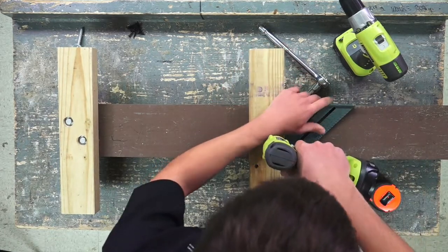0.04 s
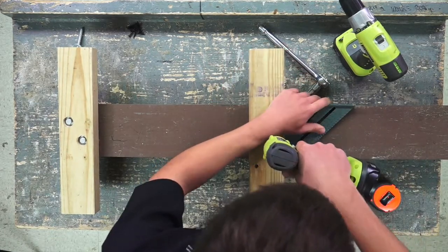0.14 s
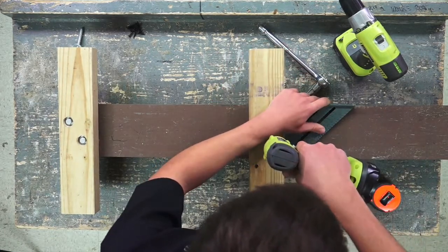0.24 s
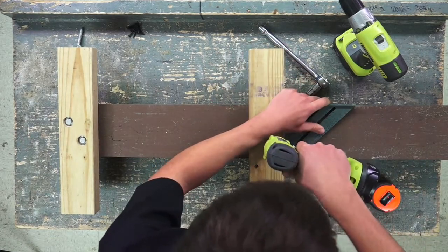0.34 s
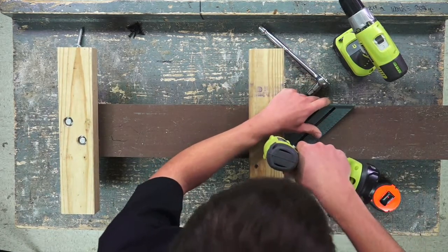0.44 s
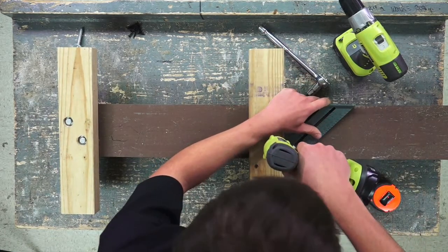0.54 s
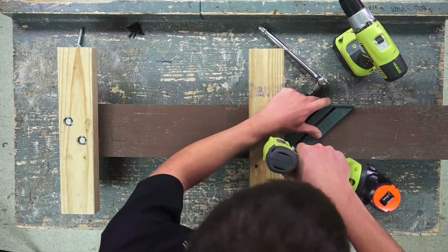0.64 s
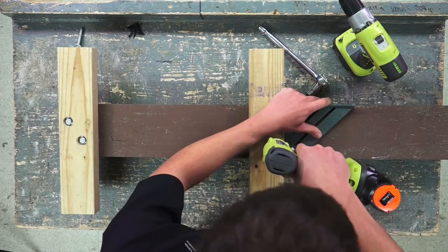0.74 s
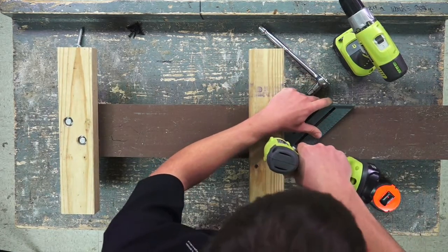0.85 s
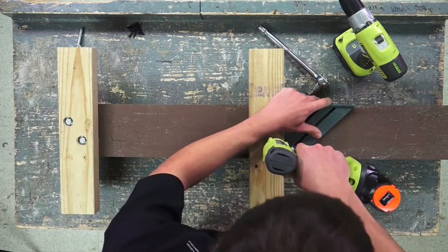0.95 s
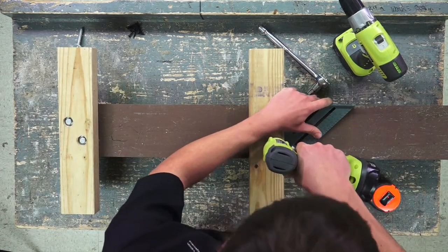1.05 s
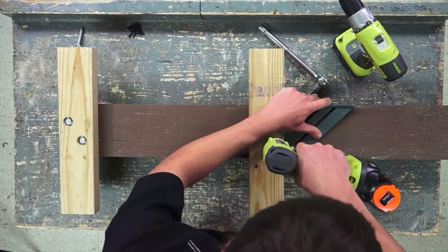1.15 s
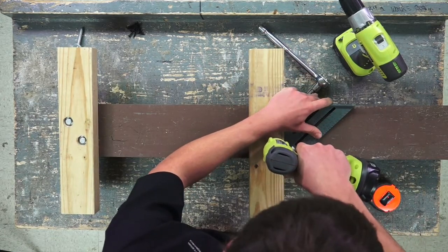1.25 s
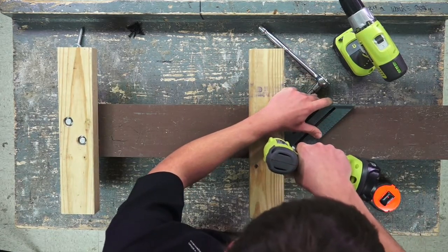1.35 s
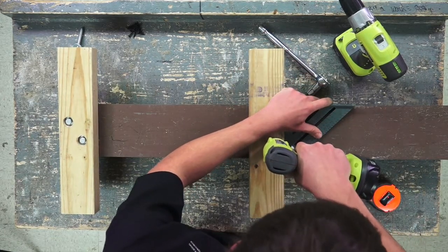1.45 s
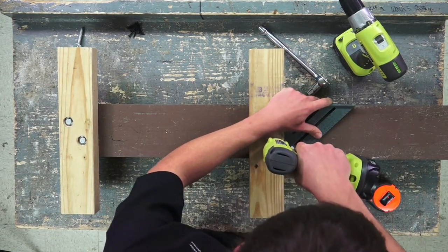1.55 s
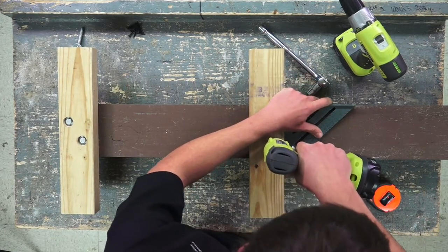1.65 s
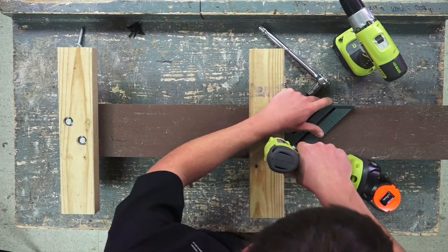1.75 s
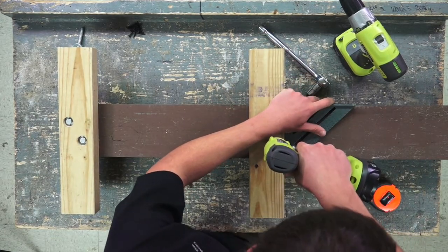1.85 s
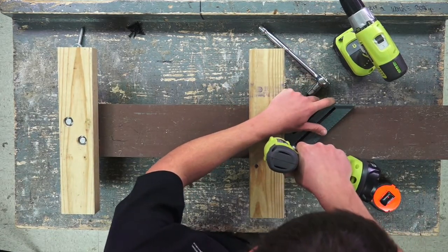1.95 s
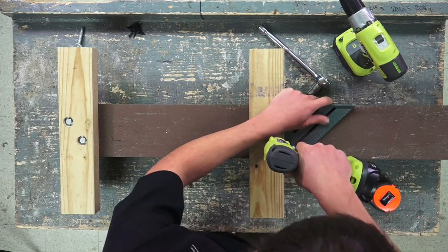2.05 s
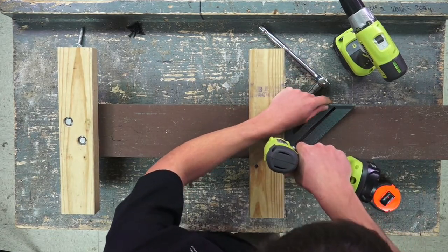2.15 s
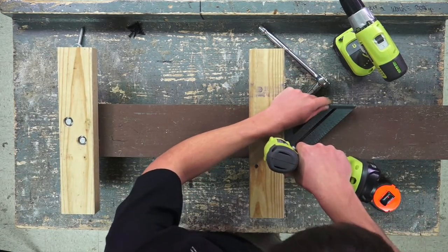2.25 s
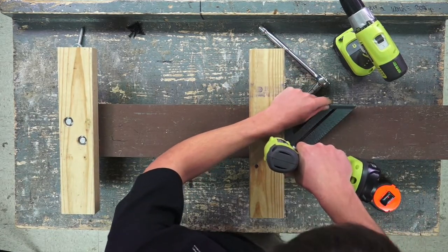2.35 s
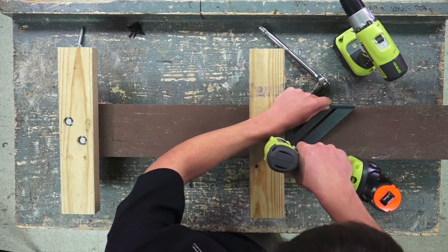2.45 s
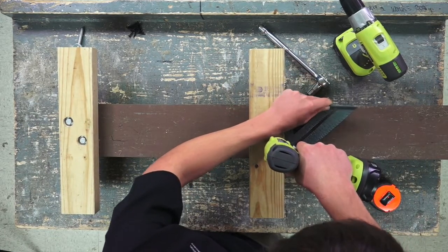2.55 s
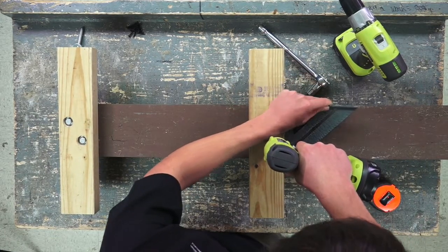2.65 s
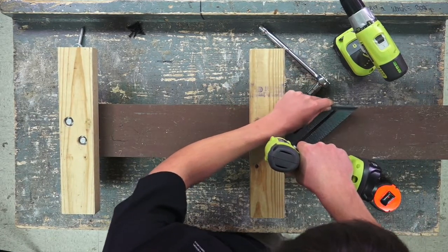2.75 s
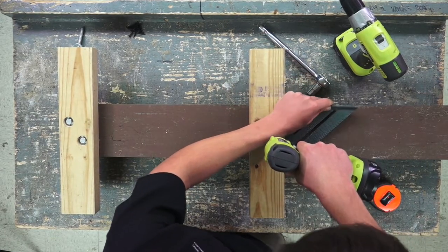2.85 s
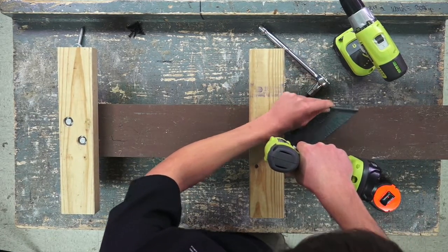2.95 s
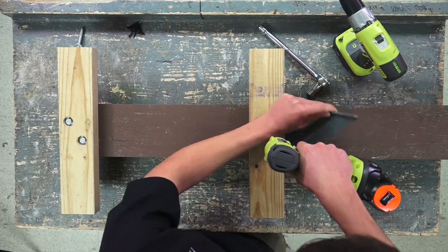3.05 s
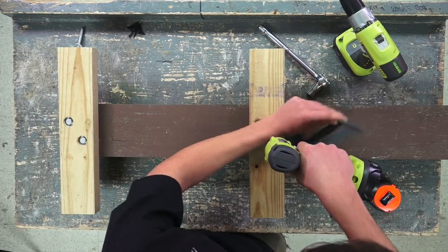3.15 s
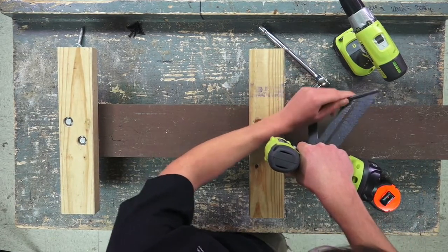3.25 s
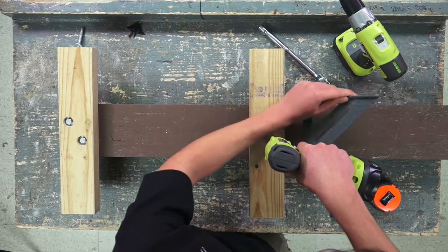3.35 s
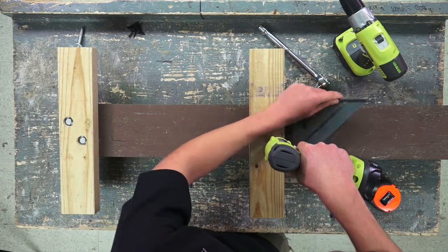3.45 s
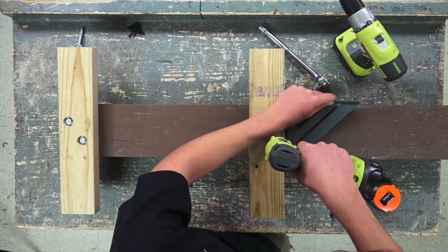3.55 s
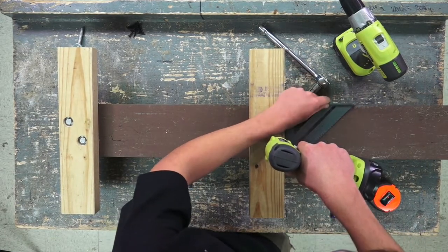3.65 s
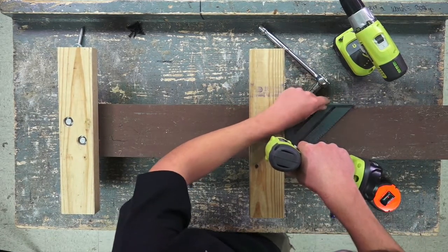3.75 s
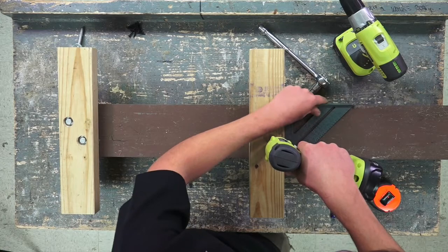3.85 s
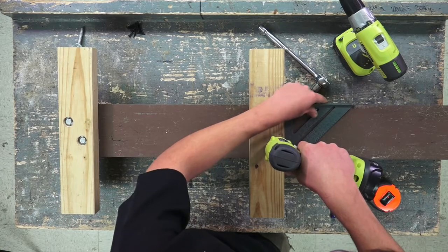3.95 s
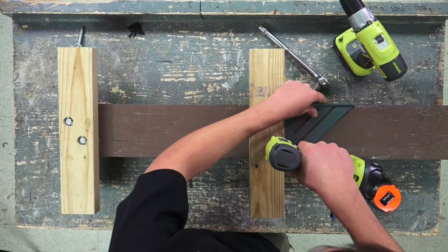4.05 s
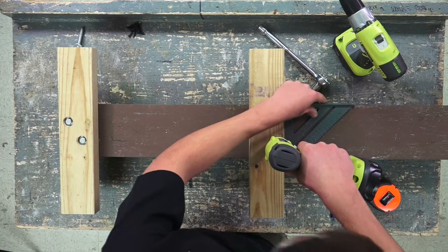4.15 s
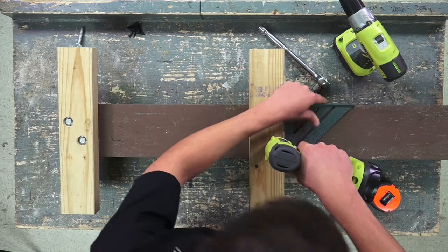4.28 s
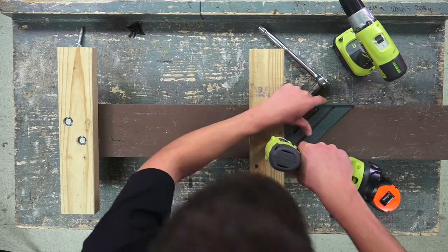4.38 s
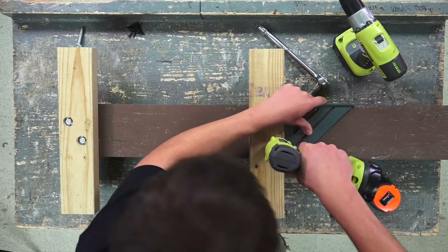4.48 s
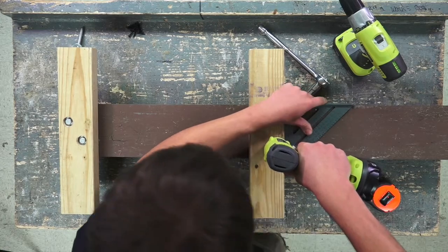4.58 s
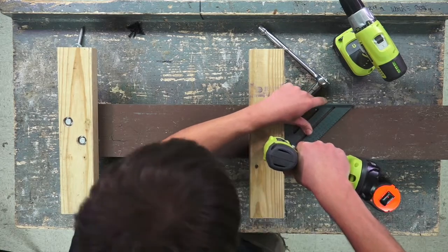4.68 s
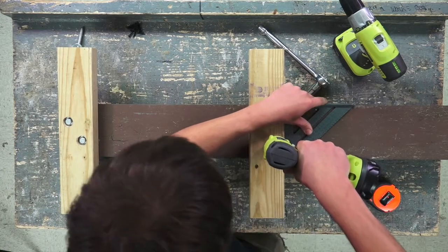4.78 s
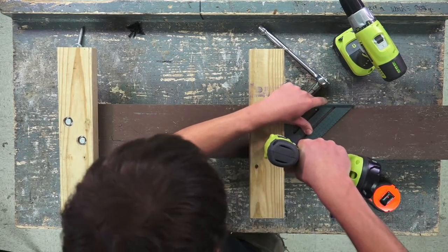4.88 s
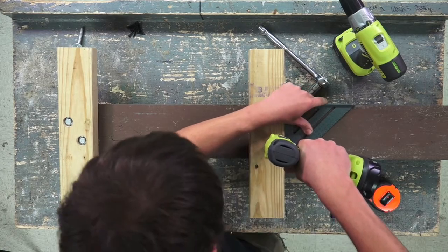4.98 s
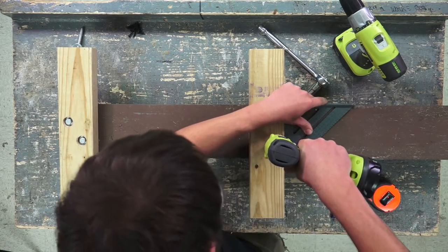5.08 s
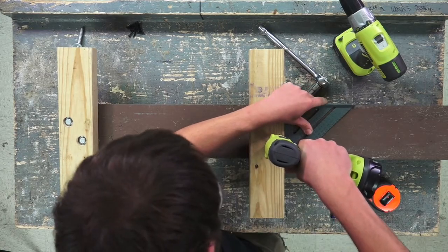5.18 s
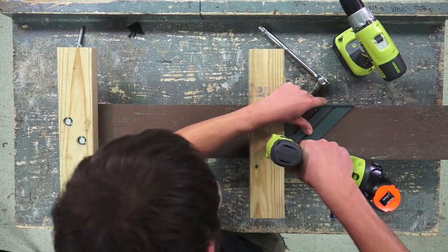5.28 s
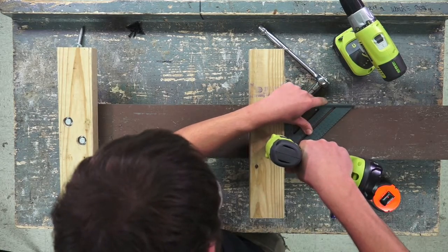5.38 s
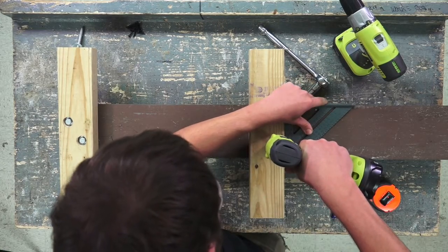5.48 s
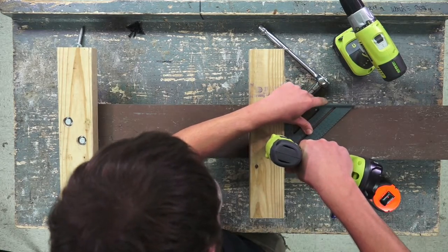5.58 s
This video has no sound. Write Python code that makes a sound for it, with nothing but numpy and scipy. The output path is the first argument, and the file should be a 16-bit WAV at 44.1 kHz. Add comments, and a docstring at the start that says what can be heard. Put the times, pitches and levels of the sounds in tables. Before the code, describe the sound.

A cordless impact driver spins up and hammers a bolt into a wooden board for about a second, a loud, fast metallic rattle, then winds down. In the pause come faint knocks on wood, and a metal square is lifted, set down with a clink and slid briefly. A second, similar burst follows. An overhead microphone picks it up in a small workshop with a faint ventilation hum.

```python
"""Small workshop, one overhead microphone. A cordless impact driver runs a bolt into a board on a bench.
Two bursts: the controller whistles, the motor spins up, the hammer strikes the anvil about 52 times a
second. Each blow cracks, rings the tool and thumps the bench. Between bursts a metal square is lifted,
set down with a clink and slid along the wood. Ventilation and mains hum lie underneath."""
import sys
import numpy as np
from scipy import signal
from scipy.fft import rfft, irfft, next_fast_len
from scipy.io import wavfile
from scipy.ndimage import uniform_filter1d

SR = 44100
rng = np.random.default_rng(int(sys.argv[2]) if len(sys.argv) > 2 else 0)


def store_pcm(level_fs):
    """Save levels as 16-bit WAV."""
    pcm = np.round(np.clip(level_fs, -1, 1) * 32767).astype(np.int16)
    wavfile.write(sys.argv[1], SR, np.atleast_2d(pcm).T)


N = 247842

# steady hammering: first_s, last_s, top_rate_hz, bite_s, sag_hz_per_s
BURSTS = [(.6943, 1.785, 53.875, .847, 4.26), (4.5615, 5.62, 52.975, 5.107, 7.94)]
# blow force set by the wood's resistance, one curve per burst: time_s, level_db
BLOW_FORCE = [
    [(0.77, -20.5), (0.92, -16.5), (1.04, -17), (1.07, -17), (1.25, -20), (1.31, -16), (1.43, -18),
     (1.46, -14), (1.78, -16)],
    [(4.64, -20), (4.76, -16.0), (4.91, -17), (4.94, -13.5), (5.09, -16.5), (5.21, -14), (5.24, -18.5),
     (5.36, -14), (5.59, -16)],
]
# single blows as the hammer catches and lets go: start_s, level_db
STRAY_BLOWS = [(.660, -21.5), (.685, -17.5), (.7055, -10.5), (1.8, -14.5), (1.834, -15.5), (1.883, -17),
               (4.533, -10.5), (4.5551, -15)]
# housing, socket and bolt: pitch_hz, nominal_width_hz, gain_db
TOOL_MODES = [(643.6, 190, -8.5), (1002, 140, -1), (1394, 280, -1.5), (1720, 320, -4), (2185, 110, 1.5),
              (2870, 180, -3.5), (3566, 160, 0.5), (4426, 150, -5.5), (4980, 300, -8.5), (5680, 200, -17.5),
              (6923, 660, -13)]
# board and bench: pitch_hz, nominal_width_hz, gain_db
BENCH_MODES = [(106.7, 10, -0.5), (203, 26, 0.5), (246.6, 82, -7), (360.8, 16, -2.5), (396.8, 17, -4.5),
               (505, 17, -1), (641, 66, -3.5), (731, 30, -2.5), (1086.4, 43, 7)]
# steel on steel: freq_hz, gain_db
CRACK_SPECTRUM = [(300, -60.5), (1500, -19), (3000, -3), (4500, 5), (6200, -1), (7200, -3), (9000, -2.5),
                  (11000, -5.5), (14000, -6.5), (15600, -4.5)]
# trigger: press_s, motor_start_s, release_s
TRIGGER_PULLS = [(.589, 0.64, 1.878), (4.472, 4.496, 5.7)]
# gears and fan: freq_hz, gain_db
WHIRR_SPECTRUM = [(47, -30.5), (80, -13), (177, -8.5), (774, -8.5), (1080, 4.5), (1600, -2), (1950, -4),
                  (2490, -6.5), (2720, -4), (5040, -12), (15500, -33)]
# coasting bearings: freq_hz, gain_db
BEARING_SPECTRUM = [(100, -14), (250, 1), (500, -8), (1000, -6), (2000, -9), (5000, -25), (15000, -44)]
# square touches board: start_s, clink_db, thud_db
CLINKS = [(3.205, -51.5, -83), (3.217, -43.5, -73.5), (3.553, -32, -53), (3.612, -32.5, -55),
          (3.650, -41.5, -63), (3.675, -47, -73), (3.736, -57, -74)]
# square's blade and stock: pitch_hz, gain_db, t60_s
SQUARE_MODES = [(481, -5, 0.38), (704, -2, 0.13), (1085, 8, 0.12), (1235, 10.5, 0.038), (1590, -1.5, 0.17),
                (1865, -2, 0.15), (2395, 9.5, 0.049), (3040, -10.5, 0.23), (3320, -3, 0.19),
                (3580, 3, 0.086), (3920, -3, 0.2), (4350, 1, 0.2), (4530, 4, 0.081), (5040, 10.5, 0.038),
                (5780, -4, 0.16), (6800, -6, 0.09), (7000, -9, 0.14), (8500, -10, .12), (9450, -7, 0.086)]
# blade ringing in the air: pitch_hz, level_db, t60_s
BLADE_MODES = [(1028, -74, 0.99), (5750, -63, 0.26), (7060, -67, 0.27)]
# square's contact tick: freq_hz, gain_db
TICK_SPECTRUM = [(200, -2.0), (1200, 0), (2800, -1.5), (4800, 4.5), (9000, -9), (15000, -28)]
# hand and tool on wood: start_s, level_db
KNOCKS = [(.108, -64), (2.268, -53), (3.036, -53.5), (3.897, -61), (4.031, -50), (4.262, -66.5)]
# knock or bright scrape on wood: freq_hz, gain_db
WOOD_SPECTRUM = [(150, -11), (450, -2.5), (800, -3), (1250, 1), (2000, -18), (4600, -17), (9000, -24.5),
                 (15000, -38)]
# square over the grain: centre_s, half_length_s, level_db, brightness (0-1)
SLIDES = [(3.222, 0.033, -64.5, 0.7), (3.718, .06, -54, 0.23)]
# slow, dull slide: freq_hz, gain_db
RUB_SPECTRUM = [(80, 1), (200, 0), (450, 0), (800, -0.5), (1300, -17.5), (4000, -42)]
# hand over wood and metal: centre_s, half_length_s, level_db
BRUSHES = [(2.62, 0.032, -78), (2.805, 0.037, -77.5), (2.988, 0.047, -76.5), (3.192, 0.018, -84),
           (4.026, 0.011, -71.5), (4.466, 0.058, -70.5)]
# skin friction: freq_hz, gain_db
SKIN_SPECTRUM = [(300, -12), (1500, 9), (3000, 5), (6000, 2), (10000, -4), (15000, -10)]
# mains hum: pitch_hz, level_db
MAINS_HUM = [(119.8, -70.5), (179.7, -78.5), (240, -75), (360, -83.5), (480, -82.5), (1561, -94),
             (1680, -95.5), (1798, -92.5), (1922, -94.5)]
# ventilation: freq_hz, gain_db
VENT_SPECTRUM = [(20, -23.5), (45, -14), (70, 2.5), (100, -6), (150, -15.5), (240, -19.5), (330, -23.5),
                 (480, -24), (650, -29), (1000, -30.5), (1900, -37.5), (2150, -38), (6000, -46),
                 (16000, -54.5)]
# room decay: freq_hz, t60_s
ROOM_DECAY = [(150, 0.85), (500, 0.41), (1100, 0.3), (2000, 0.26), (6000, 0.26), (14000, 0.14)]


def hammer(repeat_share=0.55, body_db=-4.5, steel_db=-1.66, snap_db=-7.5, thump_db=-17, rebound_db=-7):
    """Each blow cracks, rings the tool, thumps the bench and rebounds. Returns (rattle, thump)."""
    body, steel, thump = np.zeros((3, N))
    t = np.arange(SR // 20) / SR
    gain = np.sqrt(SR / 52)  # unit energy to unit power at 52 blows/s

    def contact():
        return puff(t, rise_s=.00088, t60_s=.023)

    def varied(faces):  # the same faces meet each time, so part of the sound repeats
        return np.sqrt(repeat_share) * faces * fade(t, .18) + np.sqrt(1 - repeat_share) * contact()

    lugs, ramps = whiten(contact()), whiten(contact())
    steady, loose = steady_blows(), loose_blows()
    for s, db, crack_db in steady + loose:
        add(body, s + .0005, gain * amp(db + body_db) * varied(lugs))
        add(steel, s + .0004, gain * amp([crack_db + snap_db]))
        add(steel, s, gain * amp(crack_db + steel_db) * puff(t, .00081, .012))
    for s, db, _ in loose:
        add(thump, s + .0022, gain * amp([db - 8]))
    for s, db, crack_db in steady:
        add(thump, s + .002, gain * amp([.49 * db + thump_db]))  # spring push varies less than the clash
        # hammer ticks at end of travel, then scrapes back over the lugs
        tick_shift, scrape_shift, tick_force, scrape_force = rng.standard_normal(4)
        tick = amp(crack_db - 11 + 2.7 * tick_force) * puff(t, .00029, .007)
        scrape = amp(crack_db - 10 + 4 * scrape_force) * puff(t, .00033, .0071)
        add(steel, s + .012 + .00047 * tick_shift, gain * tick)
        add(steel, s + .0148 + .00081 * scrape_shift, gain * scrape)
        add(body, s + .0135, gain * amp(db + rebound_db + 2 * scrape_force) * varied(ramps))
    return resonate(body, TOOL_MODES) + colour(steel, CRACK_SPECTRUM), resonate(thump, BENCH_MODES)


def steady_blows(lag_hz=1.955, settle_s=.151, kick_db=9, kick_s=.03, jitter_s=.00008):
    """One blow per slip over the anvil, slower once the bolt bites. Rows: start_s, body_db, crack_db."""
    rows = []
    for (first_s, last_s, top_hz, bite_s, sag_hz_per_s), force in zip(BURSTS, BLOW_FORCE):
        t = np.arange(first_s, last_s, 1 / SR)
        sag_hz = sag_hz_per_s * np.maximum(t - bite_s, 0)
        rate_hz = top_hz - lag_hz * np.exp((first_s - t) / settle_s) - sag_hz
        slips = np.cumsum(rate_hz) / SR
        s = np.interp(np.arange(int(slips[-1]) + 1), slips, t)
        momentum_db = kick_db * np.exp((first_s - s) / kick_s)  # from the run-up
        force_db = np.interp(s, *np.transpose(force)) + momentum_db
        tightening_db = -.13 * np.interp(s, t, sag_hz)
        shift, scatter_db, sharpness = rng.standard_normal((len(s), 3)).T
        body_db = force_db - 1 + scatter_db
        crack_db = -25 + tightening_db + .65 * (force_db - force_db.mean()) + scatter_db + 1.2 * sharpness
        rows += zip(s + jitter_s * shift, body_db, crack_db)
    return rows


def loose_blows(bounce_s=.0098, bounce_db=-9, chatter_s=1.921, gap_s=.017, gap_ratio=.49, loss_db=3):
    """Stray blows bounce once; after the first burst the hammer chatters to rest. Rows as above."""
    rows = [(s + k * bounce_s, db + k * bounce_db, -27 + k * bounce_db)
            for s, db in STRAY_BLOWS for k in (0, 1)]
    s = chatter_s
    for k in range(4):
        rows.append((s, -33 - k * loss_db, -34.5 - k * loss_db))
        s += gap_s * gap_ratio ** k
    return rows


def motor(idle_hz=6300, loaded_hz=5830, coast_hz=467.5, spin_up_db_per_s=758, brake_db_per_s=215):
    """Controller whistles, lower and louder under load; gears and fan whirr; rotor brakes and coasts."""
    t, sound = np.arange(N) / SR, np.zeros(N)
    for press_s, start_s, release_s in TRIGGER_PULLS:
        running, coast_s = t > start_s, np.maximum(t - release_s, 0)
        whistle_hz = np.where(running, loaded_hz, idle_hz)
        whistle_gain = (t > press_s) * (t < start_s + .02) * amp(np.where(running, -48.5, -65.5))
        whistle = tone(whistle_hz) + amp(-11) * tone(2 * whistle_hz)
        sound += uniform_filter1d(whistle_gain, size=130) * whistle
        whirr_db = np.minimum(-57 + spin_up_db_per_s * (t - start_s), -24) - brake_db_per_s * coast_s
        sound += running * amp(whirr_db) * noise(WHIRR_SPECTRUM)
        rotor = amp(-40.5 - 105 * coast_s) * tone(coast_hz - 110 * coast_s)
        bearings = amp(-53.5 - 55 * coast_s) * noise(BEARING_SPECTRUM)
        sound += (t > release_s) * (rotor + bearings)
    return sound


def metal_square(ring_db=-2.5, tick_db=15, board_db=28, lift_s=3.216, airborne_s=.27):
    """Each contact ticks, rings the metal and thuds the board. Lifted, the blade rings until damped."""
    ring, ticks, thuds = np.zeros((3, N))
    t = np.arange(SR) / SR
    hz, mode_db, t60_s = np.transpose(SQUARE_MODES)[:, :, None]
    for s, clink_db, thud_db in CLINKS:
        gains = amp(mode_db + 3 * rng.standard_normal(hz.shape))
        modes = gains * np.sin(2 * np.pi * (hz * t + rng.random(hz.shape))) * fade(t, t60_s)
        add(ring, s, amp(clink_db + ring_db) * modes.sum(0) / np.linalg.norm(gains))
        add(ticks, s, amp(clink_db + tick_db) * puff(t, rise_s=.000094, t60_s=.044))
        add(thuds, s, amp([thud_db + board_db]))
    for hz, db, t60_s in BLADE_MODES:
        add(ring, lift_s, amp(db) * np.sin(2 * np.pi * hz * t) * fade(t, t60_s) * (t < airborne_s))
    return ring + colour(ticks, TICK_SPECTRUM) + resonate(thuds, BENCH_MODES[:3])


def knocks(gain_db=17.5):
    """Hand and tool tap the wood."""
    taps, t = np.zeros(N), np.arange(SR // 5) / SR
    for s, db in KNOCKS:
        add(taps, s, amp(db + gain_db) * puff(t, rise_s=.00081, t60_s=.042))
    return colour(taps, WOOD_SPECTRUM)


def slides(grain_db=3, dulling_per_s=6.2):
    """The square scrapes over the grain, darker as it slows."""
    t, sound = np.arange(N) / SR, np.zeros(N)
    grain = amp(grain_db * unit(uniform_filter1d(rng.standard_normal(N), size=200)))
    scrape, rub = noise(WOOD_SPECTRUM), noise(RUB_SPECTRUM)
    for s, half_s, db, brightness in SLIDES:
        bright = np.clip(brightness - dulling_per_s * (t - s), 0, 1)
        sound += amp(db) * swell(s, half_s) * (np.sqrt(bright) * scrape + np.sqrt(1 - bright) * rub)
    return grain * sound


def brushes():
    """Skin friction swells and fades with each stroke."""
    return sum(amp(db) * swell(s, half_s) for s, half_s, db in BRUSHES) * noise(SKIN_SPECTRUM)


def workshop(vent_db=-63.5):
    """Mains hum and ventilation rumble."""
    t = np.arange(N) / SR
    hum = sum(amp(db) * np.sqrt(2) * np.sin(2 * np.pi * (hz * t + rng.random())) for hz, db in MAINS_HUM)
    return hum + amp(vent_db) * noise(VENT_SPECTRUM)


def room(x, build_s=.0013):
    """Wall reflections; treble dies first."""
    hz, t, bands = signal.stft(rng.standard_normal(SR), SR, nperseg=256)
    envelope = fade(t, along(ROOM_DECAY, hz)[:, None]) * (1 - np.exp(-t / build_s))
    tail = signal.istft(bands * envelope, SR, nperseg=256)[1]
    return signal.fftconvolve(x, tail / np.linalg.norm(tail))[:N]


def amp(db):
    return 10 ** (np.asarray(db) / 20)


def unit(x):
    return x / np.sqrt(np.mean(x ** 2) + 1e-20)


def fade(t, t60_s):
    return np.exp(-np.log(1000) * t / t60_s)


def swell(centre_s, half_s):
    return np.exp(-((np.arange(N) / SR - centre_s) / half_s) ** 2)


def tone(hz):
    return np.sin(2 * np.pi * np.cumsum(hz) / SR)


def noise(spectrum):
    return unit(colour(rng.standard_normal(N), spectrum))


def puff(t, rise_s, t60_s):
    """Contact noise, unit energy."""
    x = rng.standard_normal(len(t)) * (1 - np.exp(-t / rise_s)) * fade(t, t60_s)
    return x / np.linalg.norm(x)


def whiten(x):
    """Flat spectrum, same phase, unit energy."""
    flat = irfft(np.exp(1j * np.angle(rfft(x))), len(x))
    return flat / np.linalg.norm(flat)


def add(track, start_s, sound):
    part = track[round(start_s * SR):][:len(sound)]
    part += sound[:len(part)]


def along(points, hz):
    """Interpolate on a log frequency axis."""
    point_hz, values = np.transpose(points)
    return np.interp(np.log(hz + 1), np.log(point_hz + 1), values)


def through(x, response):
    """Filter by response(hz), scaled to unit mean power."""
    size = 2 * next_fast_len(N // 2 + SR // 4)
    gain = response(np.fft.rfftfreq(size, 1 / SR))
    gain /= np.sqrt(np.mean(np.abs(gain) ** 2))
    return irfft(rfft(x, size) * gain, size)[:N]


def colour(x, spectrum):
    """Minimum-phase filter of the given shape."""
    def response(hz):
        cepstrum = irfft(np.log(amp(along(spectrum, hz))))
        return np.exp(rfft(2 * cepstrum[:len(hz) - 1], len(cepstrum)))
    return through(x, response)


def resonate(x, modes):
    """Damped body: modes of alternating sign, width at least 20 Hz, Q at most 30."""
    def response(hz):
        total = 0
        for k, (pitch_hz, width_hz, db) in enumerate(modes):
            damping = 1j * hz * max(width_hz, 20, pitch_hz / 30)
            total += (-1) ** k * amp(db) * damping / (pitch_hz ** 2 - hz ** 2 + damping)
        return total
    return through(x, response)


def scene():
    """Direct sound, reflections and background; mono on both channels."""
    rattle, thump = hammer()
    near = rattle + motor() + metal_square() + knocks() + slides() + brushes()
    reflections = room(amp(-7.5) * near + amp(-13) * thump)
    mono = near + thump + reflections + workshop()
    return np.array([mono, mono])


def record(dry, low_cut_hz=50, top_hz=15950):
    """Microphone: low cut, soft clip, band limit."""
    lean = signal.sosfilt(signal.butter(2, low_cut_hz, "highpass", fs=SR, output="sos"), dry)
    rounded = lean / (1 + np.abs(lean) ** 6) ** (1 / 6)
    lowpass = signal.firwin(301, top_hz, window="blackman", fs=SR)
    return signal.fftconvolve(rounded, lowpass[None], mode="same", axes=1)


dry = scene()
out = record(dry)
store_pcm(out)
```